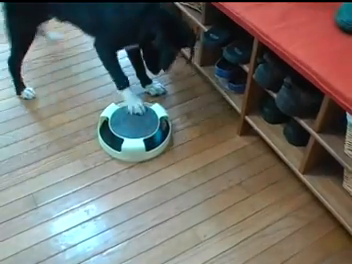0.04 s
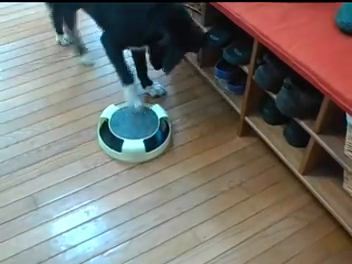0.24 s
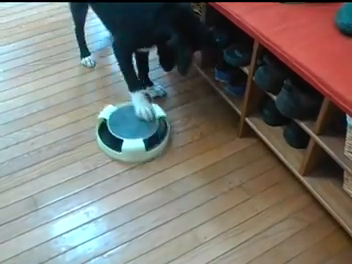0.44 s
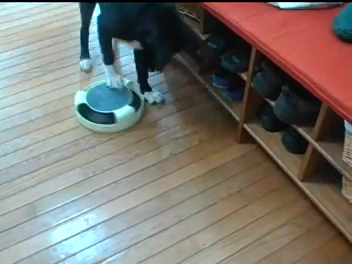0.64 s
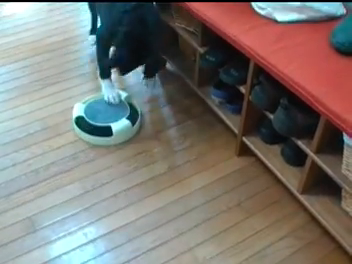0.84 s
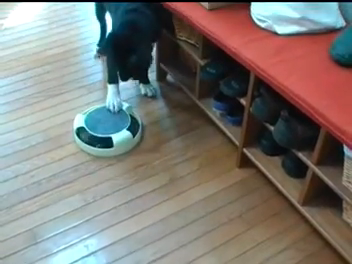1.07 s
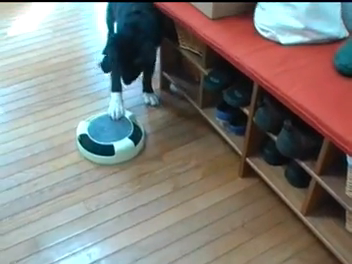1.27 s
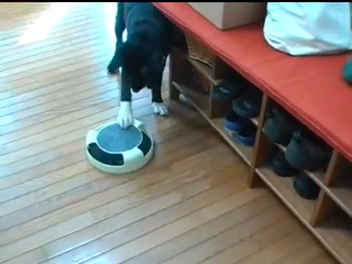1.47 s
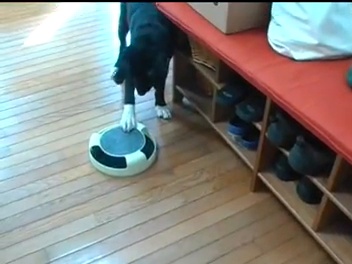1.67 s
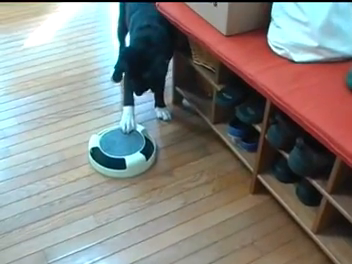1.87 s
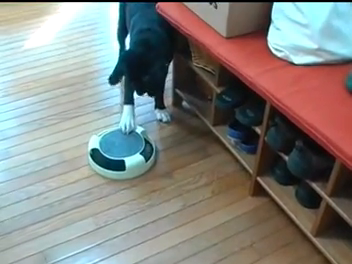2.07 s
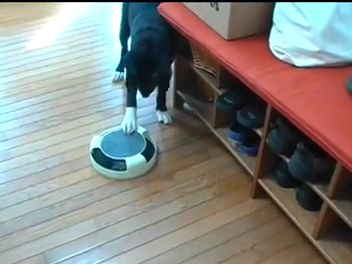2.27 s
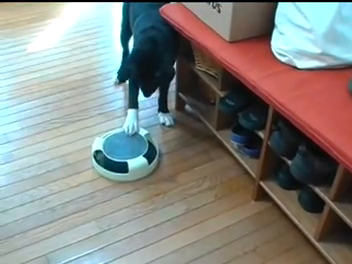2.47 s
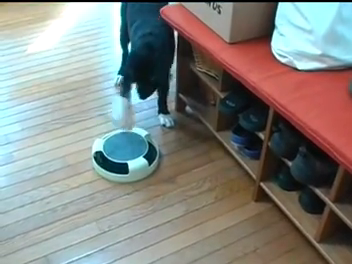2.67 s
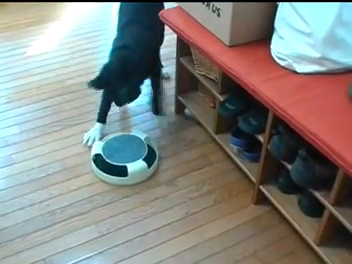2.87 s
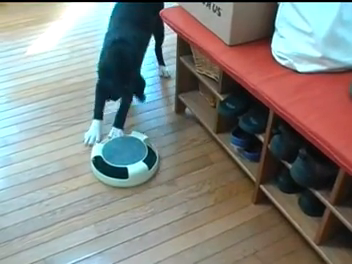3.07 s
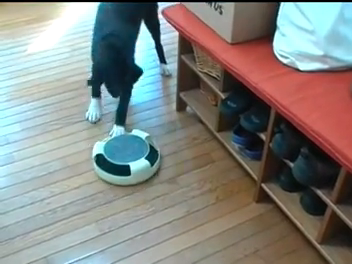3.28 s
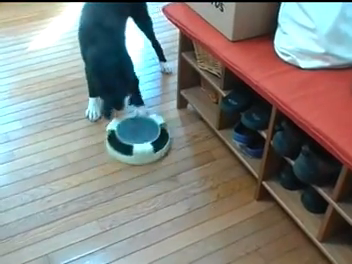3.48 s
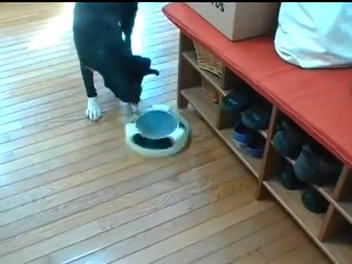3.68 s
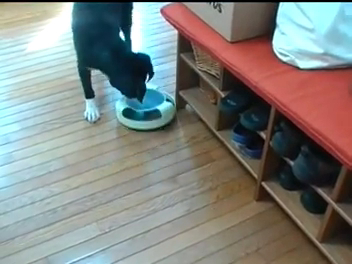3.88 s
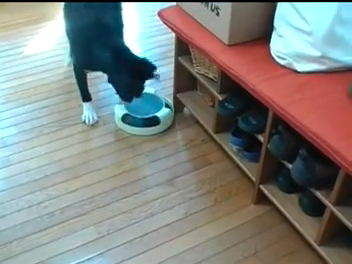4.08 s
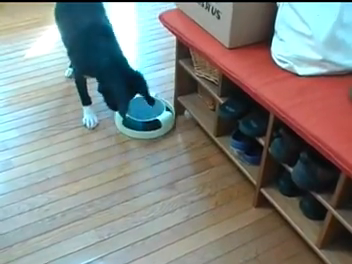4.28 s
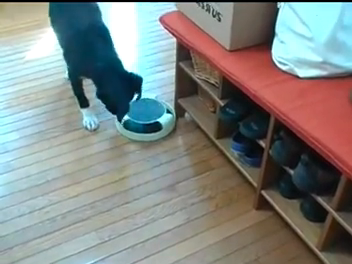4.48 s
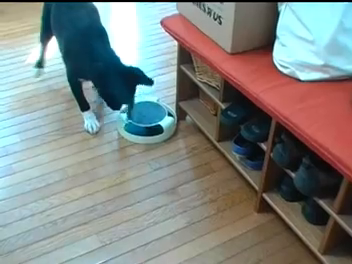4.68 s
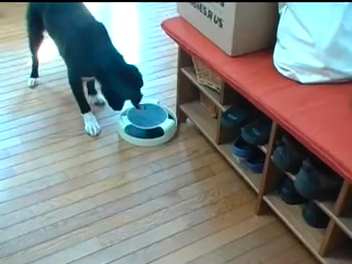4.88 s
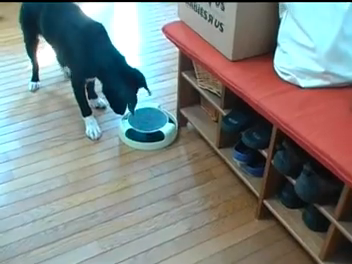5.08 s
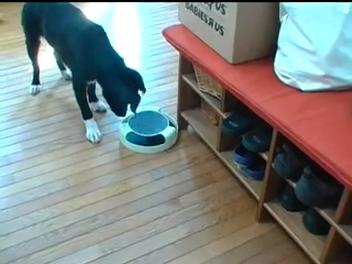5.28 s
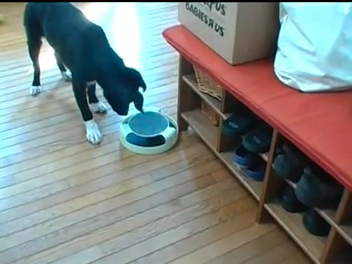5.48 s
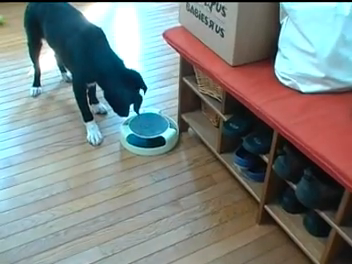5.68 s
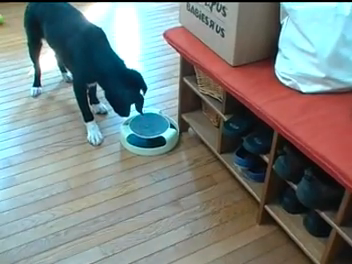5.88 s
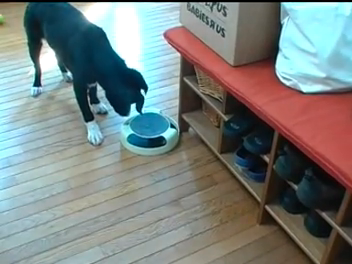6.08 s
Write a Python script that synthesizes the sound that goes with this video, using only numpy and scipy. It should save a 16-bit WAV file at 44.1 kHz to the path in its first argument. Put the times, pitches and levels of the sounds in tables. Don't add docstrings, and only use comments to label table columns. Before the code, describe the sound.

A quiet indoor hallway with soft air hiss and a faint, steady low hum throughout. Almost at once, around 0.06 seconds, claws crack and tick on a hollow plastic toy and its rim knocks the boards; lighter touches follow, then a gritty scrape with a rapid run of bright catches from about 0.45 to 0.6. A couple of claw ticks come near 0.9, a faint knock at 1.1, and then near quiet with weak rubs and taps around 2.1 and 2.4. At 2.8 a hollow knock lands, sharp clacks follow at 3.0 and 3.3, and a rough drag from 3.6 ends in a hard double slam near 3.8. The loudest burst, bright clattering claws and plastic, comes at 4.2 to 4.35. Small ticks at 4.5 and 4.7 finish it; hum and air continue to about 6 seconds. Each impact leaves a short, hard-room echo.

```python
import sys
import numpy as np
from scipy import signal
from scipy.fft import rfft, irfft
from scipy.io import wavfile
from scipy.ndimage import uniform_filter1d

SR = 44100
rng = np.random.default_rng(int(sys.argv[2]) if len(sys.argv) > 2 else 0)


def boost(x):
    u = np.asarray(x, float) / 20
    return 10 ** u


def master(y):
    cut = np.clip(np.atleast_2d(y).T, -1, 1)
    pcm = np.round(cut * 32767)
    wavfile.write(sys.argv[1], SR, pcm.astype(np.int16))


N = 270774

# frequency in Hz, density in dB per Hz.
AIR_TONE = [(18, -40), (30, -10), (70, -20.5), (115, -16.5), (150, -9.5), (180, -12.5), (235, -7),
            (381, -6), (617, -8.5), (926, -11.5), (2200, -19.5), (5000, -24.5), (11900, -27), (12200, -46)]
# frequency in Hz, side against mid in dB.
AIR_SIDE = [(60, -23), (110, 0.5), (200, -15), (370, -15), (670, -13.5), (1230, -16), (2260, -5),
            (4130, -3.5), (7560, -1), (13800, 2)]
# start in seconds, shell top peak in dB, shell pitch in Hz,
# floor thump against the top in dB.
KNOCKS = [(0.0604, -37.5, 1360, -32), (0.2198, -49, 880, -27), (0.2397, -62, 700, 12),
          (0.3649, -41.5, 594, -27), (1.1028, -49.5, 1490, -0.5), (2.7798, -30, 1500, -10.5),
          (2.782, -30.5, 1210, -38), (2.7874, -37, 1060, 9), (2.8003, -45, 497, -4),
          (3.0128, -24, 2960, -11), (3.1254, -36.5, 1740, -15), (3.2943, -28.5, 944, -14.5),
          (3.3383, -29, 915, -22), (3.7715, -25.5, 704, -17), (3.781, -28, 744, 3), (3.8296, -53, 800, 1),
          (3.9047, -41, 553, -8), (3.9123, -39, 800, 3.5), (4.2882, -29, 1689, -15.5),
          (4.3454, -19, 2600, -14)]
# start in seconds, shell top peak in dB, shell pitch in Hz,
# claw crack against the top in dB.
TICKS = [(0.068, -30.5, 3020, 4.5), (0.8598, -31.5, 1540, -2.5), (0.8827, -38, 3580, -3),
         (0.8904, -44, 3880, 12), (2.1057, -44, 2570, -3), (2.4333, -51, 2380, 1), (2.996, -38.5, 3500, 0),
         (2.9988, -23, 3600, -25), (3.0088, -29.5, 910, -4), (3.246, -42, 3170, -9), (3.5682, -43, 2240, 1),
         (4.22, -23.5, 1750, -7), (4.223, -22, 3570, -5), (4.2314, -38, 3500, 3), (4.2395, -36, 3620, -9),
         (4.2563, -27.5, 3060, -13), (4.2775, -18.5, 4750, -1.5), (4.3157, -14, 3210, -6),
         (4.3241, -15.5, 2640, -5), (4.5087, -35, 1560, -25), (4.6736, -38, 1770, -0.5),
         (4.688, -43, 4400, 4.5)]
# start in seconds, shell top peak in dB, shell pitch in Hz.
SNAGS = [
    (0.4774, -47, 2240),
    (0.4807, -28, 3040),
    (0.5036, -26, 1260),
    (0.5401, -20.5, 2970),
    (0.556, -24, 3730),
    (0.5694, -21.5, 4340),
    (0.5833, -20.5, 2400),
    (3.6776, -34, 2600),
    (3.7036, -31.5, 1240),
    (3.7224, -28, 3720),
]
# start in seconds, shell top peak in dB, shell pitch in Hz,
# floor thump against the top in dB, claw crack against the top in dB.
SLAMS = [
    (0.0632, -29.5, 1140, -9, 5.5),
    (0.3715, -44, 1110, -19, 10),
    (3.7735, -14, 2380, -22, -5.5),
    (3.7949, -15, 1266, -14.5, -1.5),
    (4.3346, -18.5, 1120, -14, -1),
]
# frequency in Hz, width in Hz, level in dB.
SHELL_MODES = [(760, 230, 2.5), (1174, 430, 0.5), (1563, 470, 2), (1855, 480, 0.5), (2600, 520, 0),
               (3370, 307, 8), (4400, 3100, -2.5)]
# frequency in Hz, level in dB, T60 in seconds.
BOARD_MODES = [(91.5, -29, 0.19), (127.4, -3, 0.26), (156, 3.5, 0.05), (216, 8, 0.031), (306, 7, 0.2),
               (390, 6, 0.063), (520, -5, 0.0053)]
# start in seconds, rise in seconds, fall in seconds, shell level in dB,
# boards against shell in dB.
SLIDES = [(0.075, 0.023, 0.11, -46, -8), (0.18, 0.035, 0.04, -52.5, 3), (0.39, 0.038, 0.095, -42, -4),
          (0.459, 0.02, 0.17, -33, -9), (0.49, 0.051, 0.035, -35, -19), (0.545, 0.045, 0.036, -35, -8.5),
          (0.872, 0.01, 0.016, -39.5, -30), (0.888, 0.036, 0.1, -60.5, -14), (1.02, 0.07, 0.031, -55.5, -7),
          (2.02, 0.088, 0.023, -50.5, -3), (2.41, 0.03, 0.03, -64.5, -14), (2.58, 0.14, 0.12, -65.5, 4.5),
          (3.03, 0.063, 0.11, -51.5, 0), (3.209, 0.062, 0.022, -48, -24), (3.272, 0.028, 0.03, -34.5, -8),
          (3.33, 0.014, 0.045, -42.5, -13), (3.349, 0.035, 0.13, -39.5, -10),
          (3.564, 0.0087, 0.17, -45, -3.5), (3.599, 0.18, 0.037, -32, -9.5), (4.223, 0.012, 0.069, -41, -6),
          (4.28, 0.0068, 0.025, -39.5, 4.5), (4.42, 0.021, 0.07, -51.5, -2.5),
          (4.48, 0.022, 0.062, -54.5, -4.5), (4.689, 0.0047, 0.031, -50, -5)]
# frequency in Hz, T60 in seconds.
HALL_T60 = [(100, 0.36), (260, 0.54), (700, 0.54), (1840, 0.44), (4850, 0.41), (10000, 0.44)]
# frequency in Hz, level in dB.
HALL_TONE = [(100, -6.5), (300, 4.5), (1000, 1), (3000, 3), (6000, 1), (11000, -6.5)]
# frequency in Hz, side against mid in dB.
HALL_SIDE = [(60, -2), (110, -50), (200, -66), (370, -80), (670, -57), (1230, -80), (2260, -29),
             (4130, -46), (7560, -34.5), (13800, 18.5)]

AIR_DB, HUM_HZ, HUM_WIDTH_HZ, HUM_DB = -62, 149.2, 23, -69.5
BELLY_HZ, TOP_HZ, CLAW_HZ = (500, 1500), (1500, 4300), (4300, 8500)
BELLY_EVEN_HZ, BELLY_DB_PER_OCTAVE = 1337, -11.5
TICK_BELLY_DB = -6.5
KNOCK_CRACK_DB, TICK_THUMP_DB, SNAG_THUMP_DB, SNAG_CRACK_DB = -12, -32, -30, -6
FIRST_TOUCH_DB = 8.5
RISE_POWER, FALL_POWER, HISS_DB = 1.63, 1.06, -4.5
HALL_DB, HALL_ONSET_S = -3.5, 0.001
MIC_TOP_HZ = 12750


def rms_one(x):
    return x / np.sqrt(np.mean(x ** 2) + 1e-20)


def at_hz(points, hz):
    points = np.array(points)
    return np.interp(np.log(hz + 1), np.log(points[:, 0]), points[:, 1])


def band(x, low_hz, high_hz, order=2):
    return signal.sosfilt(signal.butter(order, [low_hz, high_hz], "band", fs=SR, output="sos"), x)


def low_pass(x, hz):
    return signal.sosfilt(signal.butter(2, min(hz, 15000), fs=SR, output="sos"), x)


def resonate(x, hz, width_hz):
    r = np.exp(-np.pi * width_hz / SR)
    feedback = [1, -2 * r * np.cos(2 * np.pi * hz / SR), r * r]
    return signal.lfilter(np.array([1, 0, -1]) * (1 - r * r) / 2, feedback, x)


def coloured(x, spectrum):
    hz = np.fft.rfftfreq(len(x), 1 / SR)
    return irfft(rfft(x) * boost(at_hz(spectrum, hz)), len(x))


def to_stereo(mid, side):
    return np.array([mid + side, mid - side])


def air():
    mid, side = rng.standard_normal((2, N))
    mid = coloured(mid, AIR_TONE)
    side = boost(-9) * coloured(coloured(side, AIR_TONE), AIR_SIDE)
    return boost(AIR_DB - 1) * rms_one(to_stereo(mid, side))


def hum():
    motor = rng.standard_normal(N)
    waver = resonate(resonate(motor, HUM_HZ, HUM_WIDTH_HZ), HUM_HZ, HUM_WIDTH_HZ)
    steady = np.sin(2 * np.pi * HUM_HZ * np.arange(N) / SR)
    return boost(HUM_DB) * (rms_one(waver) / 5 + steady)


def grit(size, per_s, spread_db):
    sizes = boost(spread_db * np.minimum(rng.exponential(1, size), 4)) * rng.standard_normal(size)
    return sizes * (rng.random(size) < per_s / SR) + 1e-18


def shell(x, strengths_db=np.zeros(9)):
    return sum((-1) ** k * boost(db + strengths_db[k]) * resonate(x, hz, width_hz)
               for k, (hz, width_hz, db) in enumerate(SHELL_MODES))


def struck(force, hz, strengths_db):
    body = shell(force, strengths_db) + boost(7) * resonate(force, hz, hz / 6)
    return band(body, *BELLY_HZ), -band(body, *TOP_HZ), low_pass(band(force, *CLAW_HZ), 10300)


def boards(push):
    ring = sum(boost(db + rng.normal(0, 2.5)) * resonate(push, hz, 3 / t60_s) * t60_s
               for hz, db, t60_s in BOARD_MODES)
    return band(ring, 94, 800)


def contacts():
    rows = [(s, db, thump_db, 0, KNOCK_CRACK_DB, hz) for s, db, hz, thump_db in KNOCKS]
    rows += [(s, db, TICK_THUMP_DB, TICK_BELLY_DB, crack_db, hz) for s, db, hz, crack_db in TICKS]
    rows += [(s, db, SNAG_THUMP_DB, 0, SNAG_CRACK_DB, hz) for s, db, hz in SNAGS]
    rows += [(s, db, thump_db, 0, crack_db, hz) for s, db, hz, thump_db, crack_db in SLAMS]
    return [(s, db, thump_db, belly_db + BELLY_DB_PER_OCTAVE * np.log2(hz / BELLY_EVEN_HZ), crack_db, hz)
            for s, db, thump_db, belly_db, crack_db, hz in rows]


def knocks():
    length = 9000
    direct, spread = np.zeros((2, N + length))
    t = np.arange(length) / SR
    click = (t == 0) + 1e-18
    smooths = (band(click, *BELLY_HZ), -band(click, *TOP_HZ), band(click, *CLAW_HZ), -band(click, 128, 450))
    push = np.sin(np.pi * np.minimum(t / 0.00061, 1))
    for s, top_db, thump_db, belly_db, crack_db, hz in contacts():
        contact_s = 0.0019 + 1.1 / hz
        chatter = grit(length, 11000, 0.31) * np.minimum(t / 0.0001, 1) * np.exp(-t / contact_s)
        chatter = chatter + boost(FIRST_TOUCH_DB) * click
        parts = (*struck(chatter, hz, rng.normal(0, 2, size=9)), boards(push))
        levels_db = (belly_db - 5, -3.5, crack_db - 4.5, thump_db - 0.5)
        at = round(s * SR)
        for part, smooth, db in zip(parts, smooths, levels_db):
            part = boost(top_db + db) * part / np.abs(part).max()
            direct[at:at + length] += part
            spread[at:at + length] += rms_one(smooth) * np.sqrt(np.mean(part ** 2))
    return direct[:N], spread[:N]


def slides():
    lumps = uniform_filter1d(rng.standard_normal(N), size=250)
    rub = grit(N, 8000, 2.6) * boost(2.8 * rms_one(lumps))
    rough_shell = rms_one(shell(rub)) + 0.9 * rms_one(band(rub[::-1], 1200, 4800))
    shell_layer = -rms_one(band(rough_shell, 1090, 3700))
    boards_layer = rms_one(band(rub, 275, 1380))
    hiss_layer = rms_one(low_pass(band(rub, 4420, 9200), 4200))
    out = np.zeros(N)
    for s, rise_s, fall_s, shell_db, boards_db in SLIDES:
        a, b = round(s * SR), round((s + rise_s + fall_s) * SR)
        t = np.arange(a, b) / SR - s
        rise = np.clip(t / rise_s, 0, 1) ** RISE_POWER
        fall = np.clip(1 - (t - rise_s) / fall_s, 0, 1) ** FALL_POWER
        for layer, db in zip((shell_layer, boards_layer, hiss_layer), (0, boards_db, HISS_DB)):
            out[a:b] += rise * fall * boost(shell_db + db - 5) * layer[a:b]
    return out


def hall(x):
    t, tail = np.arange(SR * 3 // 4) / SR, 0
    edges_hz = 70 * 2 ** np.arange(0, 7.6, 0.5)
    for low_hz, high_hz in zip(edges_hz, edges_hz[1:]):
        hz = np.sqrt(low_hz * high_hz)
        dying = boost(at_hz(HALL_TONE, hz) - 60 * t / at_hz(HALL_T60, hz))
        mid, side = band(rng.standard_normal((2, len(t))), low_hz, high_hz) * dying
        tail = tail + to_stereo(mid, boost(at_hz(HALL_SIDE, hz) + 18) * side)
    tail = tail * (1 - np.exp(-t / HALL_ONSET_S))
    tail = boost(HALL_DB) * tail / np.sqrt(np.sum(tail ** 2) / 2)
    return signal.fftconvolve(tail, x[None], axes=1)[:, :N]


def scene():
    direct, spread = knocks()
    rubbing = slides()
    echoes = hall(low_pass(spread + rubbing, 12800))
    left, right = direct + rubbing + echoes + air() + hum()
    return np.array([boost(-0.3) * np.r_[0, left[:-1]], right])


def band_limit(x):
    return signal.sosfilt(signal.butter(12, 14440, fs=SR, output="sos"), x)


def record(dry):
    cut = signal.sosfilt(signal.butter(1, 70, "high", fs=SR, output="sos"), dry)
    cut = signal.sosfilt(signal.ellip(8, 1, 50, MIC_TOP_HZ, fs=SR, output="sos"), cut)
    return band_limit(cut)


dry = scene()
out = record(dry)
master(out)
```